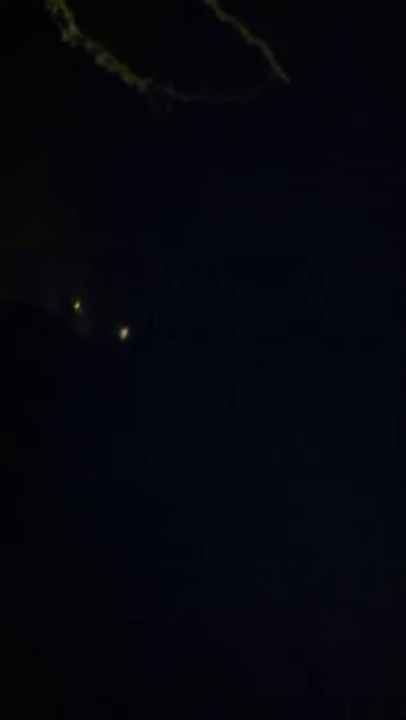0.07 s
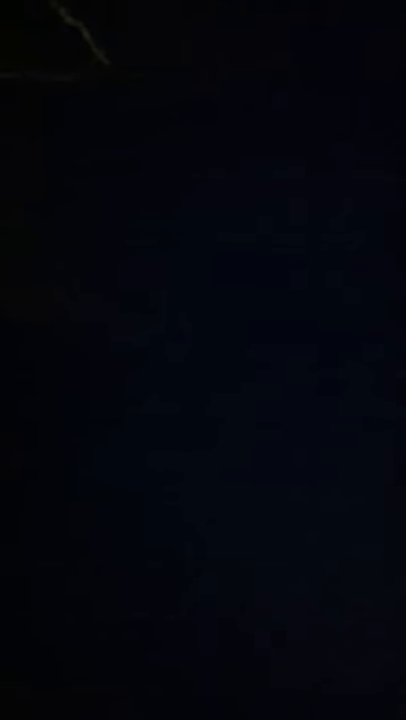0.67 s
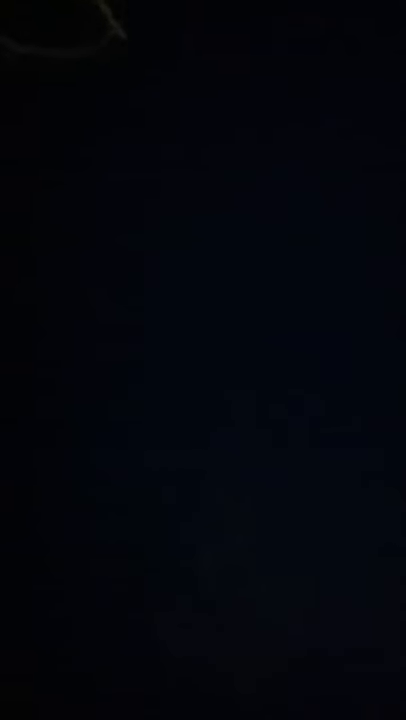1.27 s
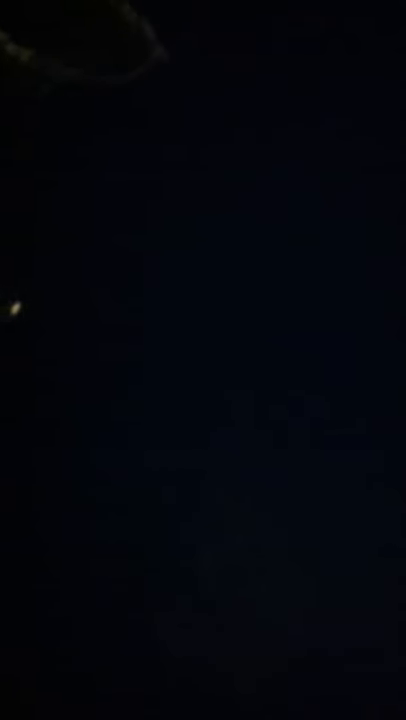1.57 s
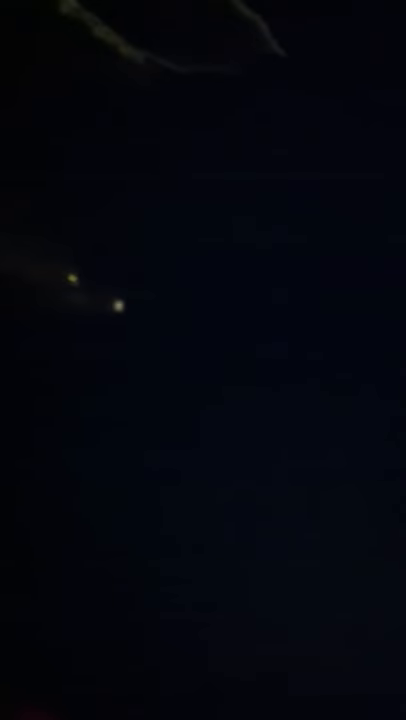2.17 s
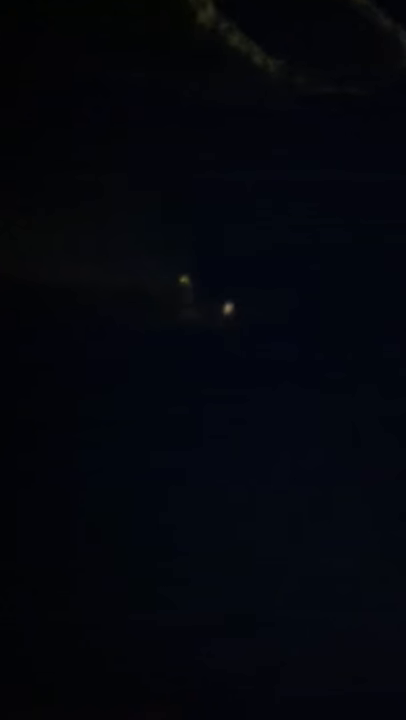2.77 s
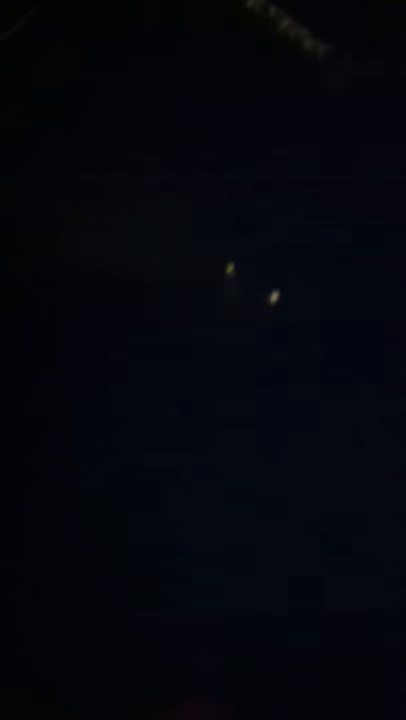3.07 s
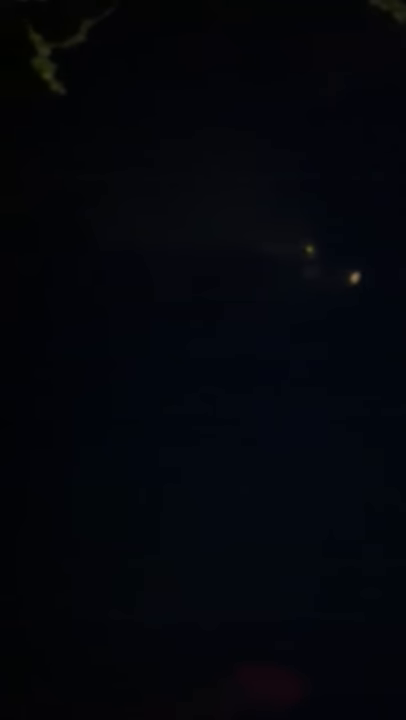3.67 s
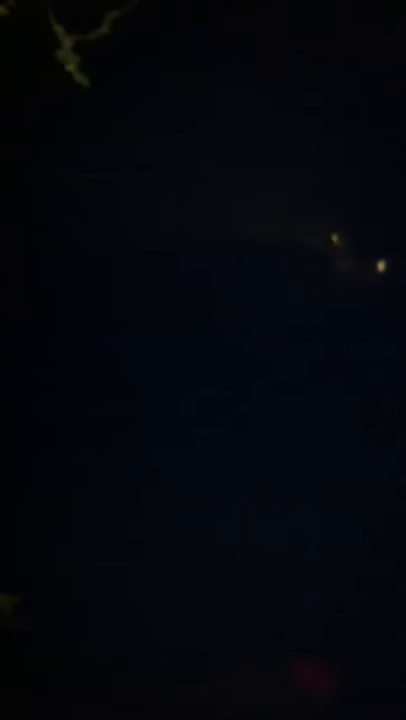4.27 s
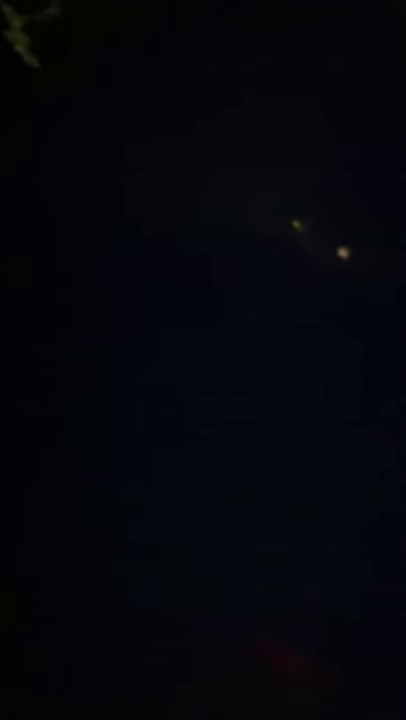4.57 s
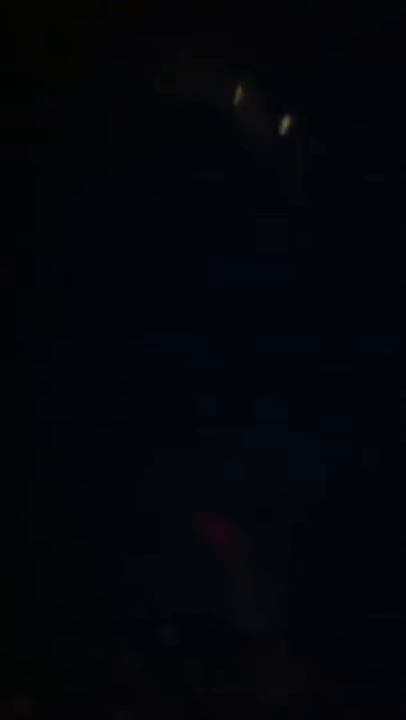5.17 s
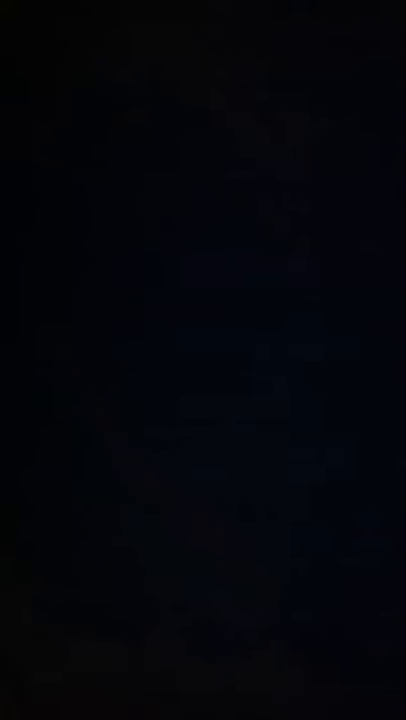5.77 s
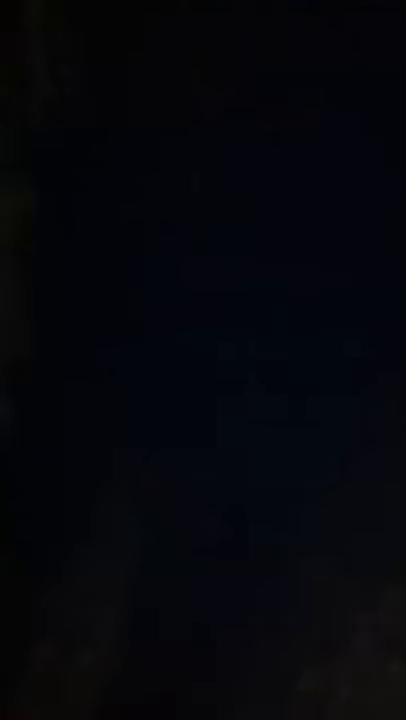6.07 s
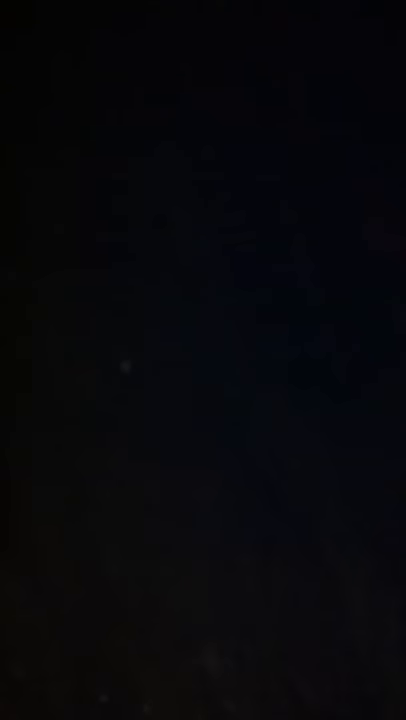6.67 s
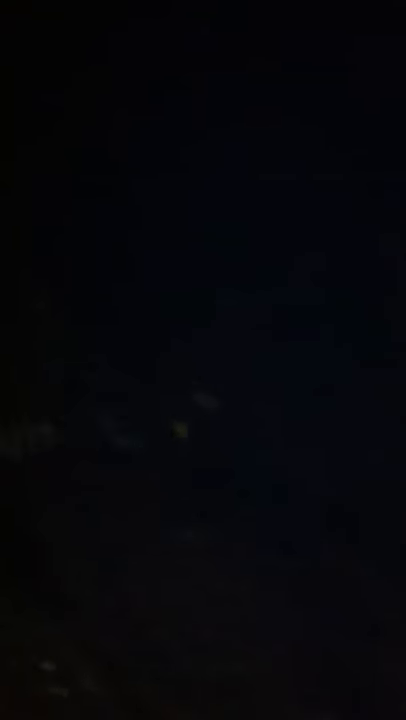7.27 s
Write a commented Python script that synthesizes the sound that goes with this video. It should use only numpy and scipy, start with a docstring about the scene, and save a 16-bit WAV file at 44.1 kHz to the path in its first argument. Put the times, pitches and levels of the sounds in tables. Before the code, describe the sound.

Coyotes call across open country at night. Thin, faint squeals come from far off, over the blurred yipping of the pack. About halfway through, nearer animals start yelping, and then two break into louder howls, one rising, the other sinking in a high falsetto. The cries echo off the hills. A low distant rumble and microphone hiss run underneath, with a few soft rustles close by.

```python
"""Thin, far squeals open a coyote chorus across open country at night.
Nearer animals then yelp, and two break into howls, one rising, one sinking in falsetto.
Each cry is a set of harmonics on an unsteady, gliding pitch; it scatters in the brush and rings
off the hills. Underneath: the blurred rest of the pack, a low distant rumble with a faint drone,
soft rustles and two ticks close by, and microphone hiss."""
import sys
import numpy as np
from scipy import signal
from scipy.fft import rfft, irfft, next_fast_len
from scipy.io import wavfile
from scipy.ndimage import uniform_filter1d, map_coordinates

SR = 44100
rng = np.random.default_rng(int(sys.argv[2]) if len(sys.argv) > 2 else 0)


def int16_out(signal):
    """Quantize to a 16-bit WAV file."""
    q = np.round(np.clip(np.atleast_2d(signal).T, -1, 1) * 32767)
    wavfile.write(sys.argv[1], SR, q.astype(np.int16))


N = 326781
T = np.arange(N) / SR

# Noise colours: (frequency [Hz], relative density [dB])
RUMBLE_SPECTRUM = [(15, -35), (25, -26), (33, -18), (53, -43), (61, -17.5), (69, -20), (97, -6.5),
                   (157, 0.5), (198, -1), (291, -3), (390, -8), (455, -10), (515, -10), (746, -12.5),
                   (1000, -17.5), (1300, -61), (2200, -120)]
HISS_SPECTRUM = [(700, -3.5), (1000, 7), (2000, 3), (3500, 1.5), (6000, 1), (9000, 0), (10800, -1.5),
                 (11700, 0), (12600, -0.5), (13700, -1.5), (14600, 1.5), (16000, -2.5)]
RUSTLE_SPECTRUM = [(40, -31), (150, 4), (400, 10), (1500, 6.5), (4000, 1), (8000, 0), (12000, -4),
                   (16000, -15)]
PACK_SPECTRUM = [(700, -32), (1000, -21), (1300, -1.5), (1450, -13.5), (1600, -6.5), (2400, -10),
                 (3200, -33)]
TICK_SPECTRUM = [(100, -18), (500, -1), (1400, 14), (2200, -15), (4000, -32), (10000, -42)]
# Far drone: (frequency [Hz], level [dB])
DRONE_TONES = [(82, -89.5), (165, -83)]
# Close rustles: (centre [s], half length [s], level [dB])
RUSTLES = [(5.8, .18, -65), (6.151, 0.097, -70.5), (6.436, 0.08, -69.5), (7.064, 0.61, -77.5)]
# Dry ticks: (time [s], level [dB])
TICKS = [(0.129, -52), (0.951, -58)]
# Far pack envelope: (time [s], gain [dB])
PACK_ENVELOPE = [(0, -74), (1.1, -82), (1.5, -78), (2.3, -79), (3.0, -90), (4.0, -78.5), (5.5, -89),
                 (7.4, -64)]

# Cry levels below apply before the path gains in coyotes().
# Squeals: (start [s], rise [s], fall [s], top pitch [Hz], scoop [share of top], level [dB],
# harmonic 2 re fundamental [dB])
SQUEALS = [(0.01, 0.044, 0.024, 1380, 0.0, -75.5, -20), (0.111, 0.011, 0.009, 1650, 0.13, -75, -17),
           (0.179, 0.013, 0.022, 1685, 0.049, -70, -18), (0.231, 0.043, 0.035, 1295, 0.12, -62.5, -7),
           (0.48, 0.006, 0.096, 1640, 0.077, -70, -17), (0.603, 0.066, 0.009, 1834, 0.325, -75, -19),
           (0.773, 0.031, 0.022, 1463, 0.007, -70, -24), (1.243, 0.034, 0.03, 1289, 0.09, -78, -14),
           (1.406, 0.028, 0.11, 1426, 0.13, -69, -13), (1.605, 0.037, 0.029, 1434, 0.026, -77, -26),
           (1.893, 0.075, 0.055, 1377, 0.3, -67, -4.5), (2.008, 0.007, 0.016, 1038, 0.135, -81.5, 14),
           (2.024, 0.02, 0.092, 1374, 0.017, -70.5, -26), (2.105, 0.081, 0.004, 1695, 0.33, -84, -26),
           (2.299, 0.054, 0.056, 1240, 0.05, -75.5, -8.5), (2.619, 0.031, 0.038, 1463, 0, -76, -20),
           (2.733, 0.047, 0.007, 1510, 0.16, -76, -13), (2.836, 0.019, 0.061, 1220, 0.2, -82.5, 8),
           (2.98, 0.039, 0.044, 1302, 0.175, -74, -8), (3.283, 0.077, 0.022, 1214, 0.11, -80, -7),
           (3.516, 0.045, 0.009, 1730, 0.18, -85, -26), (3.673, 0.027, 0.037, 1443, 0.0034, -72.5, -20),
           (3.88, 0.0078, 0.047, 995, 0.22, -75, 1.5), (4.308, 0.045, 0.023, 1915, 0.074, -58.5, -20),
           (4.558, 0.025, 0.027, 1107, 0.12, -63.5, -12), (4.66, 0.07, 0.0084, 1706, 0.16, -65, -29),
           (5.339, 0.049, 0.028, 1700, 0.084, -63.5, -12), (5.496, 0.027, 0.046, 1215, 0.1, -58, -7),
           (5.971, 0.027, 0.0098, 1890, 0.12, -50, -12.5), (6.019, 0.052, 0.06, 1306, 0.076, -54, -8.5),
           (6.829, 0.026, 0.014, 1850, 0.3, -48.5, -29)]
# Yelps: (start [s], time to turn [s], time after turn [s], first, turning, last pitch [Hz],
# peaks of harmonics 1-4 [dB])
YELPS = [(4.061, 0.039, 0.028, 645, 833, 730, -62, -63, -61.5, -70),
         (4.197, 0.088, 0.062, 756, 498.6, 558, -68.5, -63.5, -70.5, -90),
         (4.355, 0.03, 0.049, 720, 885, 550, -63, -60.5, -66, -86),
         (4.412, 0.0058, 0.043, 966, 964, 505, -67, -58.5, -65.5, -89),
         (4.51, 0.02, 0.021, 516, 509, 477, -68, -77, -64, -82),
         (4.812, 0.037, 0.037, 583, 776, 670, -80, -56.5, -63.5, -68.5),
         (4.935, 0.038, 0.065, 745, 899, 489, -67.5, -55, -61.5, -76),
         (5.112, 0.02, 0.054, 674, 706.7, 511, -58.5, -68, -58, -72),
         (5.199, 0.0073, 0.088, 534, 557, 742, -62, -62, -74, -71),
         (5.275, 0.015, 0.04, 690, 850, 570, -60.5, -57.5, -63.5, -83),
         (5.876, 0.033, 0.089, 672.5, 765, 729, -54, -65.5, -58, -67.5),
         (6.104, 0.035, 0.023, 1214, 667, 647, -49.5, -54, -72, -78.5),
         (6.159, 0.036, 0.051, 689, 819, 585, -51, -56.5, -71.5, -87.5),
         (6.189, 0.005, 0.043, 1115, 1090, 586, -53.5, -50.5, -74, -76),
         (6.729, 0.038, 0.014, 549, 730, 590, -49, -49, -63, -83),
         (6.756, 0.08, 0.0092, 833, 1082, 1210, -46, -52.5, -74, -77),
         (7.275, 0.081, 0.027, 858, 1016, 1033, -54, -56, -69, -74),
         (7.329, 0.085, 0.015, 486, 507, 523, -72.5, -68, -67.5, -58)]
# Throat and mouth response in a yelp: (frequency [Hz], gain [dB])
THROAT_RESPONSE = [(500, -5.5), (700, -1.5), (900, -12.5), (1200, 1), (1600, 0), (2000, -2), (2500, -5.5),
                   (3100, -7), (3600, -15)]
# Howl melodies: (time [s], pitch [Hz])
RISING_PITCH = [(5.58, 616), (5.6, 798), (5.616, 874), (5.652, 959), (5.722, 1085), (5.87, 1151),
                (6.044, 1132), (6.072, 1146), (6.2, 1111)]
FALSETTO_PITCH = [(6.872, 1423), (6.93, 1374), (7.02, 1415), (7.1, 1371), (7.192, 1283), (7.3, 1205),
                  (7.41, 1146)]
# Rising howl: (time [s], harmonics 1-3 [dB])
RISING_LEVELS = [(5.58, -78, -62, -58), (5.617, -52, -53, -67), (5.656, -51, -38, -58),
                 (5.69, -55.5, -64, -85.5), (5.731, -43, -49, -88.5), (5.81, -40.5, -61.5, -85),
                 (5.9, -35, -59.5, -77), (5.969, -46.5, -74, -85), (6.05, -40, -71, -86),
                 (6.129, -40.5, -53.5, -83), (6.2, -43.5, -69, -89.5)]
# Its period doubling: (time [s], level at 1.5 x pitch [dB], level at 2.5 x pitch [dB])
RISING_DOUBLING = [(5.651, -63.5, -68), (5.69, -48, -60), (5.73, -47.5, -70), (5.79, -52.5, -76),
                   (5.849, -69, -70.5)]
# Falsetto howl: (time [s], fundamental [dB])
FALSETTO_LEVEL = [(6.872, -38), (6.886, -36.5), (6.946, -40.5), (7.038, -33.5), (7.07, -39.5),
                  (7.19, -32.5), (7.274, -37.5), (7.284, -34.5), (7.382, -39), (7.41, -46)]


def from_db(db):
    """Decibels to gain."""
    return 10 ** (np.asarray(db) / 20)


def unit_rms(x):
    """Scale to unit power."""
    return x / np.sqrt(np.mean(x ** 2) + 1e-20)


def curves_at(rows, t):
    """Columns of a time table, interpolated at t."""
    times_s, *columns = np.transpose(rows)
    return [np.interp(t, times_s, column) for column in columns]


def drift(rate_hz, size):
    """Smooth random curve, spread about 1."""
    knots = rng.standard_normal(4000)
    return map_coordinates(knots, [np.arange(size) * rate_hz / SR + 5], order=3, mode="wrap")


def noise(spectrum):
    """Steady coloured noise, rms 1."""
    hz, db = np.transpose(spectrum)
    size = next_fast_len(N)
    bins_hz = np.maximum(np.arange(size // 2 + 1) * SR / size, 1)
    gain = from_db(np.interp(np.log(bins_hz), np.log(hz), db))
    return unit_rms(irfft(rfft(rng.standard_normal(size)) * gain, size)[:N])


def microphone_hiss():
    """Even broadband self-noise."""
    return from_db(-69.5) * noise(HISS_SPECTRUM)


def night_air():
    """Distant rumble with a faint, wavering drone."""
    rumble = from_db(-72.02 + 1.7 * drift(3.92, N)) * noise(RUMBLE_SPECTRUM)
    drone = 0
    for hz, db in DRONE_TONES:
        gain = from_db(db + 5.9 * drift(9.3, N))
        pitch_hz = hz + 2.76 * drift(11, N)
        drone += gain * np.sin(2 * np.pi * np.cumsum(pitch_hz) / SR)
    return rumble + drone


def rustles():
    """Soft swells of noise next to the microphone."""
    swells = sum(from_db(db) * np.exp(-((T - at_s) / half_s) ** 2) for at_s, half_s, db in RUSTLES)
    return swells * from_db(1.4 * drift(40, N)) * noise(RUSTLE_SPECTRUM)


def ticks(decay_s=0.0022):
    """Small, dry noise bursts close by."""
    bursts = sum(from_db(db) * (T > at_s) * np.exp(-np.abs(T - at_s) / decay_s) for at_s, db in TICKS)
    return bursts * noise(TICK_SPECTRUM)


def echoes(x, build_s, mid_t60_s, outer_t60_s, taps_per_s):
    """Scattered reflections; the mid band decays at its own rate."""
    t = T[:2 * SR]
    taps = rng.standard_normal(len(t)) * (rng.random(len(t)) < taps_per_s / SR)
    mid = signal.sosfiltfilt(signal.butter(2, [950, 1450], "band", fs=SR, output="sos"), taps)
    mid_decay = from_db(-60 * t / mid_t60_s)
    tail = mid * mid_decay + (taps - mid) * from_db(-60 * t / outer_t60_s)
    build = 1 - np.exp(-(t / build_s) ** 2)
    energy = np.sum((taps * build * mid_decay) ** 2) + 1e-20
    return signal.fftconvolve(x, tail * build / np.sqrt(energy))[:N]


def cry(rows, jitter, shimmer_db, rasp, half_order_db, edge_s, doubling=None):
    """Raspy harmonics on an unsteady pitch. Rows: (time [s], pitch [Hz], harmonic levels [dB])."""
    start_s, end_s = rows[0][0], rows[-1][0]
    span = (T > start_s - edge_s) & (T < end_s + edge_s)
    t = T[span]
    pitch_hz, *levels_db = curves_at(rows, t)
    pitch_hz = uniform_filter1d(pitch_hz, size=300)
    chest = np.clip(800 / pitch_hz, 0, 1.3) ** 2   # low notes are rough, falsetto purer
    phase = 2 * np.pi * np.cumsum(pitch_hz * (1 + jitter * chest * drift(220, len(t)))) / SR
    partials = list(enumerate(levels_db, 1))
    # Weak partial midway between the top two harmonics.
    partials.append((len(levels_db) - 0.5, levels_db[-1] + half_order_db))
    if doubling is not None:
        outside_s = np.maximum(doubling[0][0] - t, 0) + np.maximum(t - doubling[-1][0], 0)
        partials += [(k + 0.5, db - 600 * outside_s) for k, db in enumerate(curves_at(doubling, t), 1)]
    voice = 0
    for multiple, db in partials:
        air = 1 / np.sqrt(1 + (multiple * pitch_hz / 3300) ** 16)   # distance swallows the treble
        gain = from_db(db + shimmer_db * drift(69.6, len(t)))
        grit = rasp * chest * drift(700, len(t))
        voice += air * gain * (1 + grit) * np.sin(multiple * phase)
    gate = np.clip(np.minimum(t - start_s, end_s - t) / (2 * edge_s) + 0.5, 0, 1)
    out = np.zeros(N)
    out[span] = voice * np.sin(np.pi / 2 * gate) ** 2
    return out


def far_pack():
    """The farthest animals: arched yips heard as echo, over a band of noise."""
    yips = np.zeros(N)
    for when, height, length, faintness in rng.random((40, 4)):
        at_s, half_s = when * N / SR, 0.0404 + 0.054 * length
        top_hz, db = 1150 + 300 * height, -6 * faintness
        arch = [(at_s - half_s, 0.81 * top_hz, db - 13), (at_s, top_hz, db),
                (at_s + half_s, 0.94 * top_hz, db + 1.5)]
        yips += cry(arch, jitter=0.059, shimmer_db=2.0, rasp=0.15, half_order_db=-7.5, edge_s=0.018)
    blurred = unit_rms(echoes(yips, build_s=0.0044, mid_t60_s=0.48, outer_t60_s=0.34, taps_per_s=900))
    chorus = from_db(1.0) * blurred + from_db(-1.0) * noise(PACK_SPECTRUM)
    return from_db(curves_at(PACK_ENVELOPE, T)[0]) * chorus


def glide(start_s, before_s, after_s, first_hz, turn_hz, last_hz):
    """Times and pitches of a short cry that levels off at its turn."""
    t = np.linspace(start_s, start_s + before_s + after_s, 40)
    since_turn_s = t - start_s - before_s
    away = np.abs(since_turn_s) / np.where(since_turn_s < 0, before_s, after_s)
    end_hz = np.where(since_turn_s < 0, first_hz, last_hz)
    return t, turn_hz + (end_hz - turn_hz) * away ** 1.8   # power 1: pointed turn, 2: round


def swell_db(t, attack_s, release_s, depth_db):
    """Attack, hold at 0 dB, release."""
    fade = np.maximum(1 - (t - t[0]) / attack_s, 1 - (t[-1] - t) / release_s)
    return -depth_db * np.maximum(fade, 0)


def squeal(start_s, rise_s, fall_s, top_hz, scoop, level_db, octave_db):
    """Thin falsetto with its octave: scoops up, sags halfway back."""
    t, pitch_hz = glide(start_s, rise_s, fall_s, top_hz * (1 - scoop), top_hz, top_hz * (1 - scoop / 2))
    db = level_db + swell_db(t, attack_s=0.026, release_s=0.019, depth_db=1)
    rows = np.column_stack([t, pitch_hz, db, db + octave_db])
    return cry(rows, jitter=0.045, shimmer_db=4.0, rasp=0.27, half_order_db=-14, edge_s=0.007)


def yelp(row, wobble=0.014, effort_db_per_octave=6.5, dulling_db_per_s=15):
    """Chesty cry: four harmonics sweep through the throat resonances and dull as the mouth closes."""
    t, pitch_hz = glide(*row[:6])
    catches = unit_rms(uniform_filter1d(rng.standard_normal(len(t)), size=4))
    pitch_hz *= 1 + wobble * catches
    effort_db = swell_db(t, attack_s=0.021, release_s=0.016, depth_db=10.5)
    effort_db += effort_db_per_octave * np.log2(pitch_hz)
    throat_hz, throat_db = np.transpose(THROAT_RESPONSE)
    levels_db = []
    for multiple, peak_db in enumerate(row[6:], 1):
        closing_db = dulling_db_per_s * (multiple - 1) * (t - t[0])
        db = effort_db + np.interp(multiple * pitch_hz, throat_hz, throat_db) - closing_db
        levels_db.append(peak_db + db - db.max())
    rows = np.column_stack([t, pitch_hz, *levels_db])
    return cry(rows, jitter=0.014, shimmer_db=4.5, rasp=0.095, half_order_db=-16, edge_s=0.0061)


def howl(pitch_curve, level_curve, doubling=None):
    """Long, nearly pure note, with optional period doubling."""
    t = np.linspace(pitch_curve[0][0], pitch_curve[-1][0], 200)
    rows = np.column_stack([t, *curves_at(pitch_curve, t), *curves_at(level_curve, t)])
    return cry(rows, jitter=0.015, shimmer_db=2.0, rasp=0.071, half_order_db=-16, edge_s=0.0059,
               doubling=doubling)


def paths(x, direct_db, brush_db, hills_db):
    """Split a voice three ways: to the microphone, the brush and the hills."""
    return np.outer(from_db([direct_db, brush_db, hills_db]), x)


def coyotes():
    """All cries, with quick brush scatter and a long ring off the hills; far squeals blur more."""
    yelps = sum(map(yelp, YELPS))
    rising = howl(RISING_PITCH, RISING_LEVELS, RISING_DOUBLING)
    falsetto_harmonics = [(at_s, db, db - 36.5, db - 44) for at_s, db in FALSETTO_LEVEL]
    falsetto = howl(FALSETTO_PITCH, falsetto_harmonics)
    squeals = sum(squeal(*row) for row in SQUEALS)
    near, to_brush, to_hills = (paths(yelps, direct_db=2.0, brush_db=-3.5, hills_db=-4.0)
                                + paths(rising, direct_db=2.5, brush_db=-6.5, hills_db=-5.0)
                                + paths(falsetto, direct_db=1.5, brush_db=-18.5, hills_db=-15.0))
    far, far_to_brush, far_to_hills = paths(squeals, direct_db=2.0, brush_db=-3.0, hills_db=-6.0)
    brush = echoes(to_brush, build_s=0.0093, mid_t60_s=0.2, outer_t60_s=0.27, taps_per_s=1100)
    far_brush = echoes(far_to_brush, build_s=0.0084, mid_t60_s=0.55, outer_t60_s=0.58, taps_per_s=1500)
    hills = echoes(to_hills + far_to_hills, build_s=0.082, mid_t60_s=4, outer_t60_s=2.24, taps_per_s=900)
    return near + far + brush + far_brush + hills


def scene():
    """Mono sum at one microphone."""
    return (coyotes() + far_pack() + night_air() + microphone_hiss() + rustles() + ticks())[None, :]


def record(dry):
    """Steep elliptic low-pass."""
    cutoff_hz = 15800
    return signal.sosfilt(signal.ellip(12, 0.1, 70, cutoff_hz, fs=SR, output="sos"), dry)


dry = scene()
out = record(dry)
int16_out(out)
```